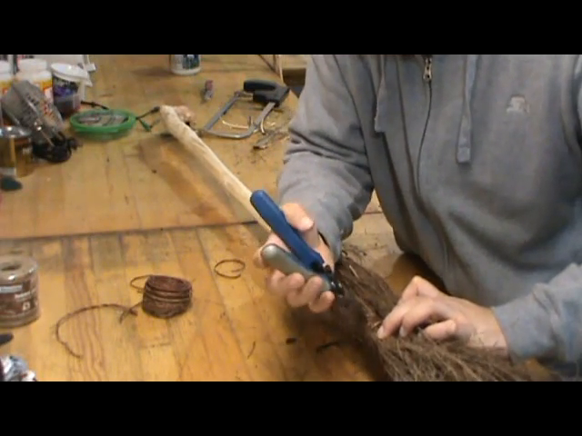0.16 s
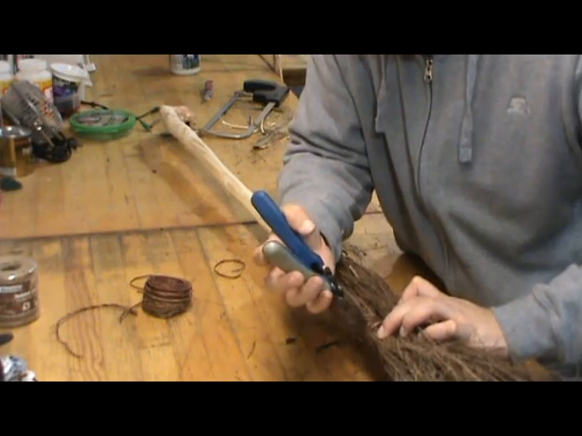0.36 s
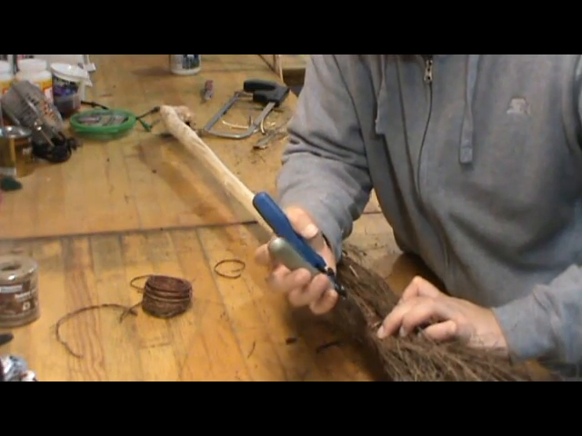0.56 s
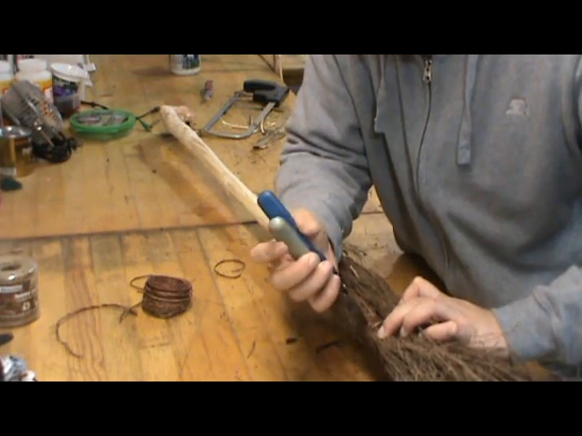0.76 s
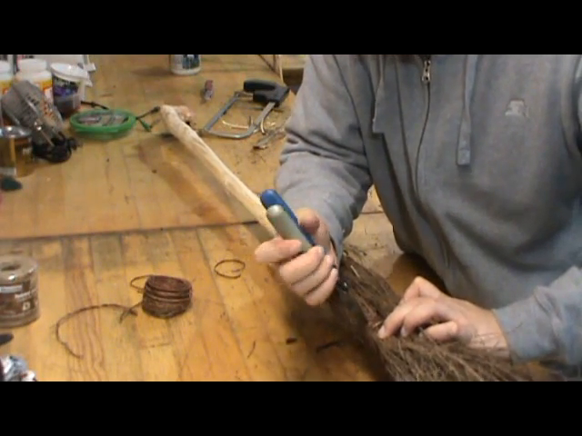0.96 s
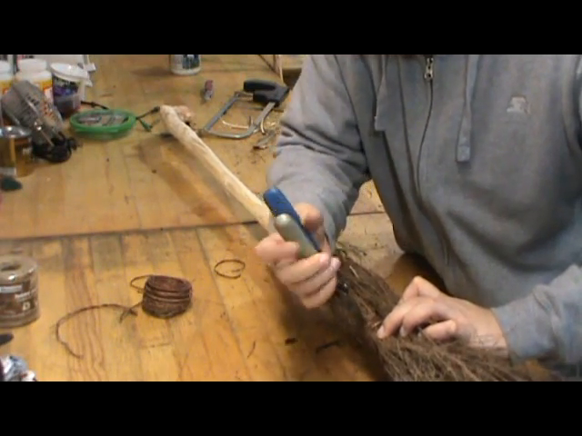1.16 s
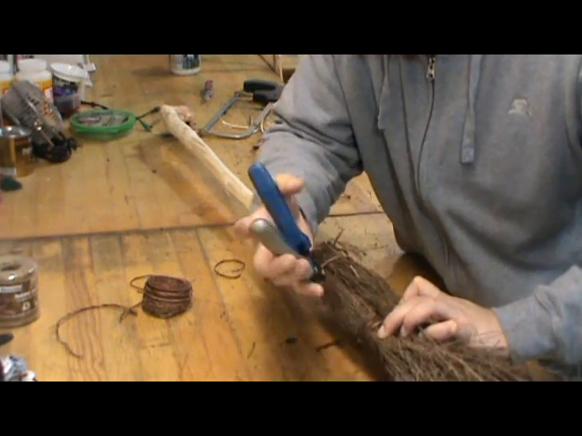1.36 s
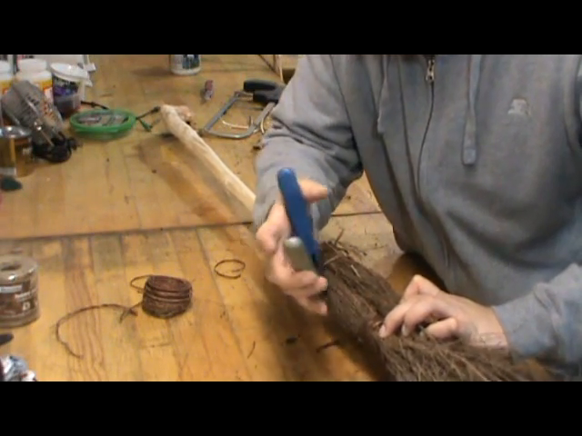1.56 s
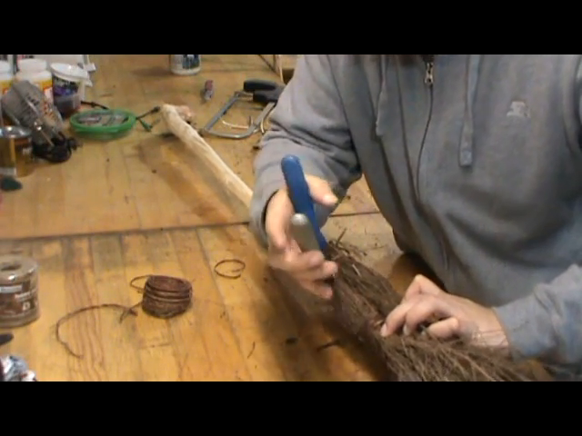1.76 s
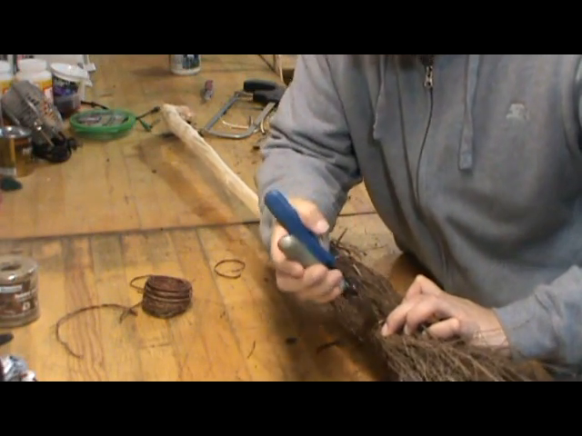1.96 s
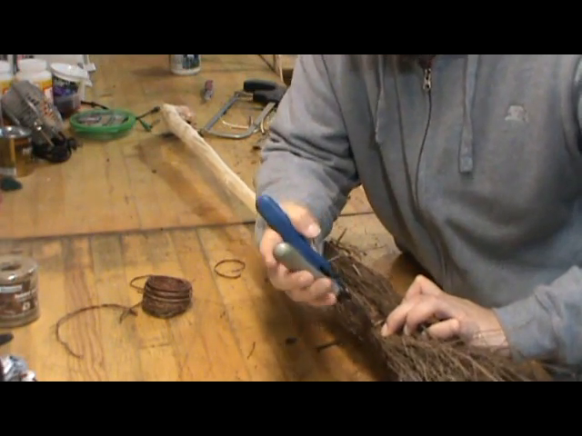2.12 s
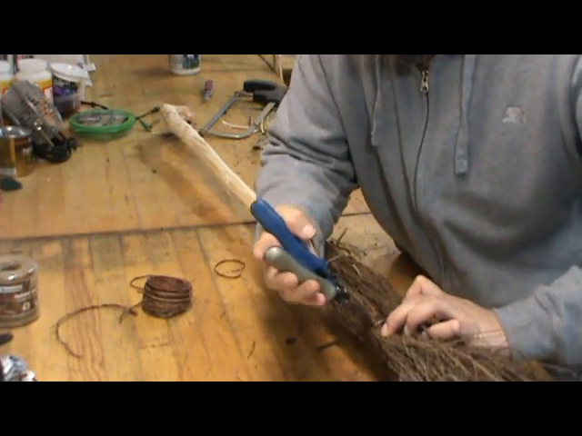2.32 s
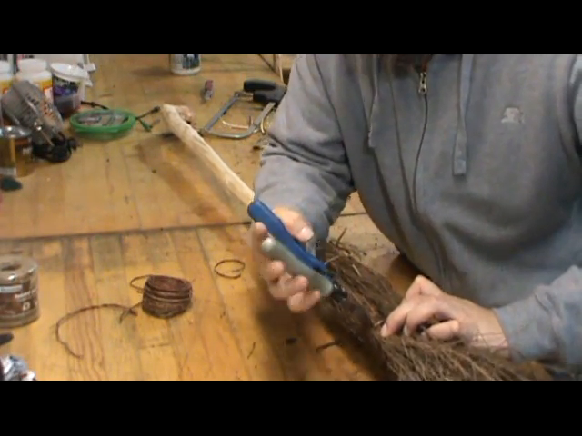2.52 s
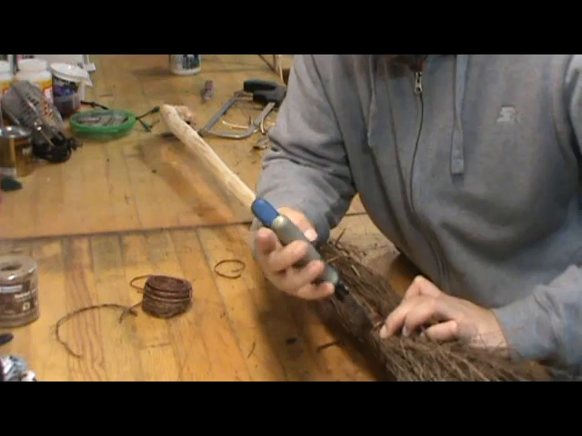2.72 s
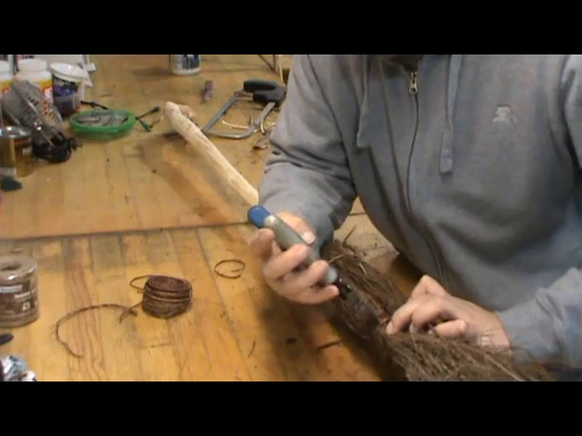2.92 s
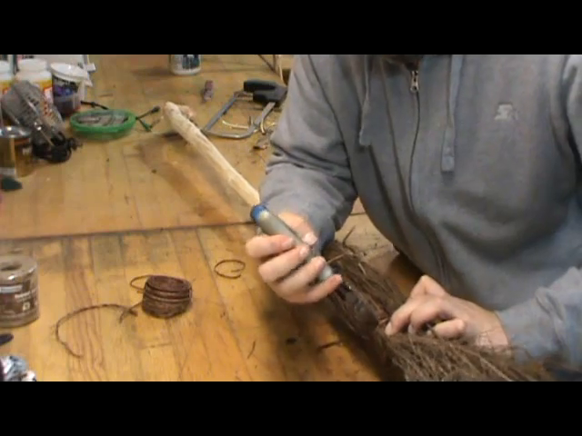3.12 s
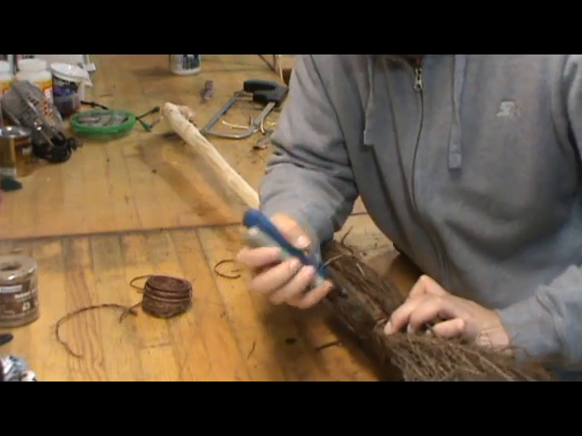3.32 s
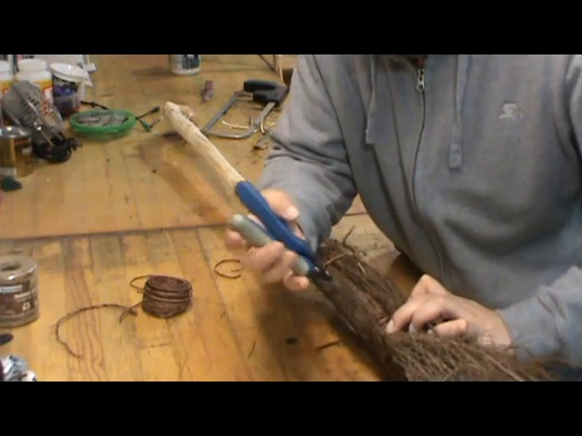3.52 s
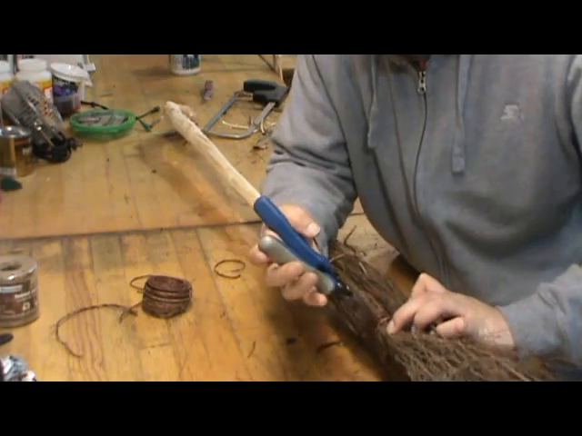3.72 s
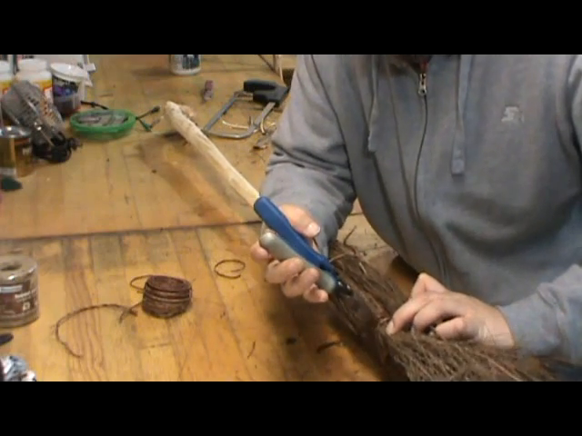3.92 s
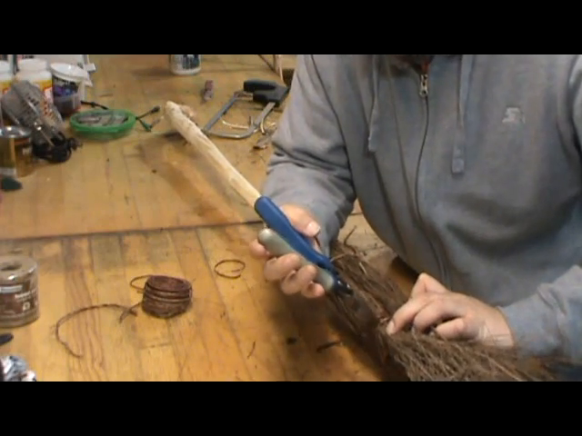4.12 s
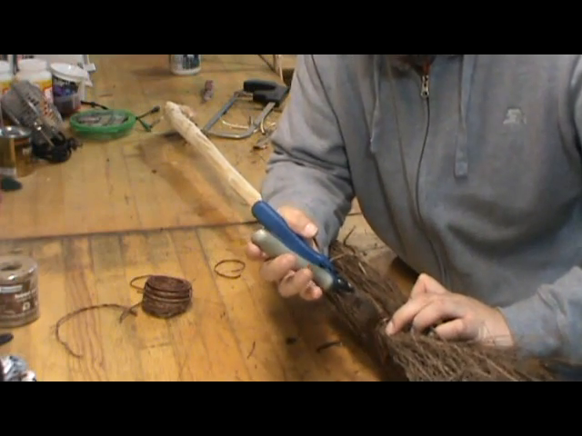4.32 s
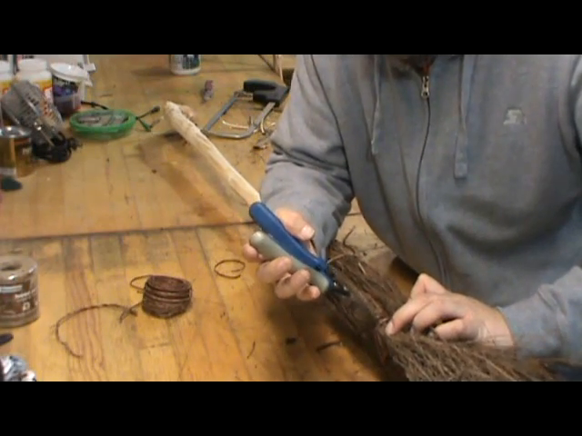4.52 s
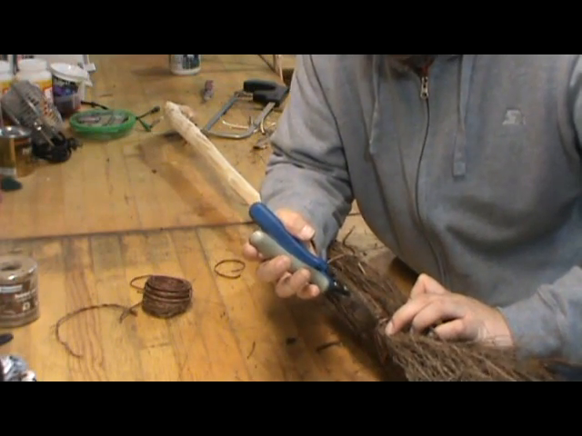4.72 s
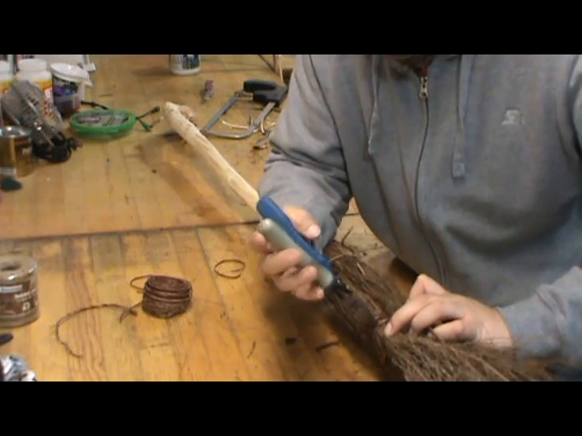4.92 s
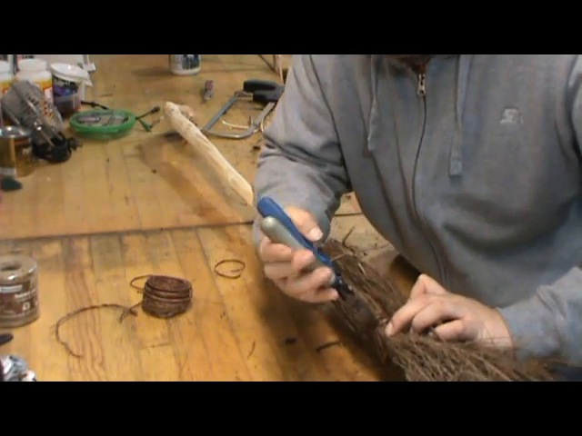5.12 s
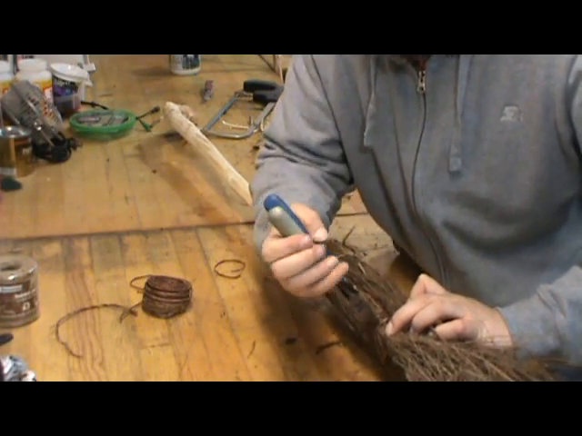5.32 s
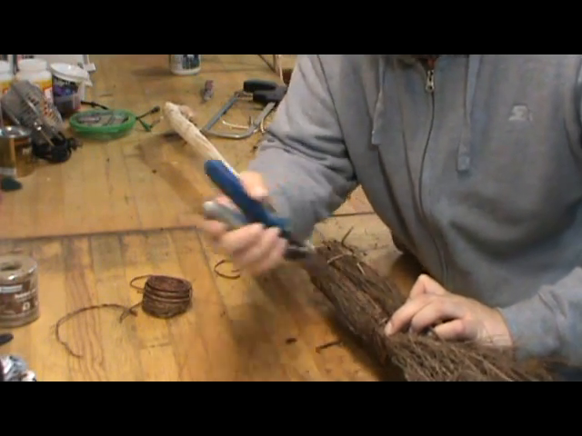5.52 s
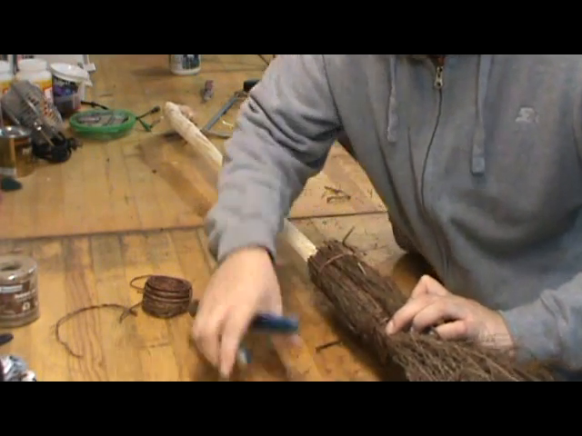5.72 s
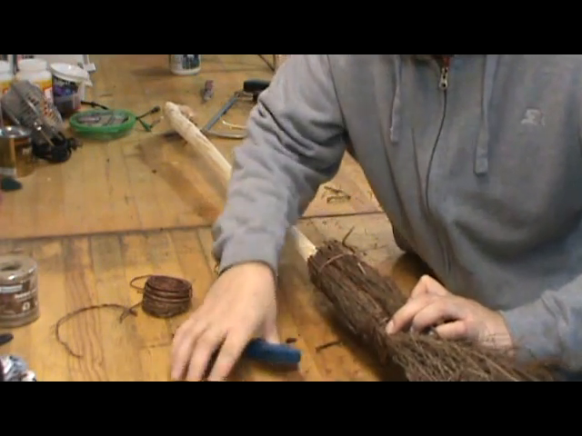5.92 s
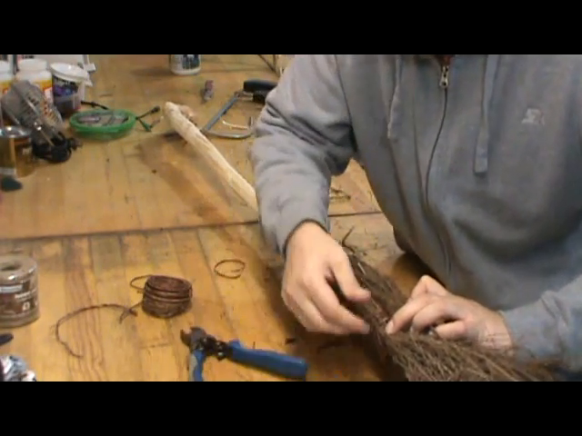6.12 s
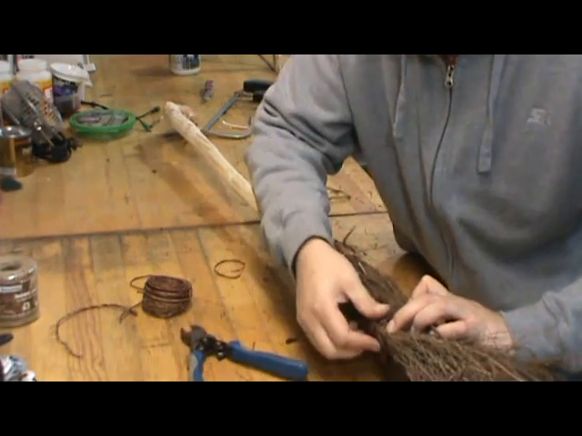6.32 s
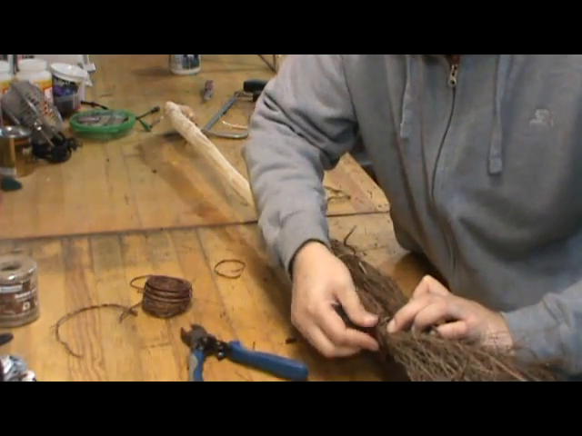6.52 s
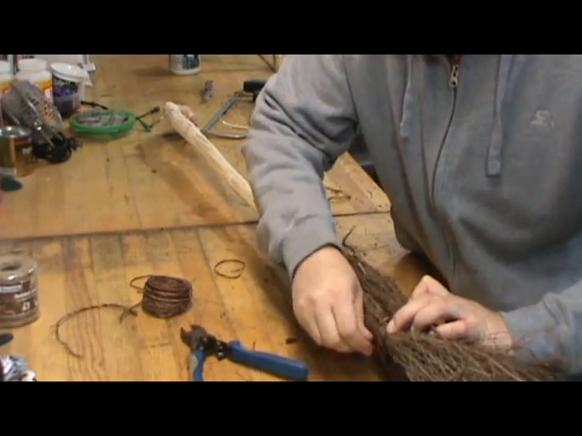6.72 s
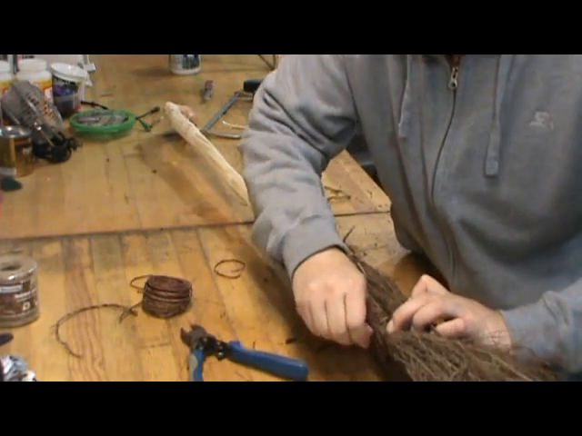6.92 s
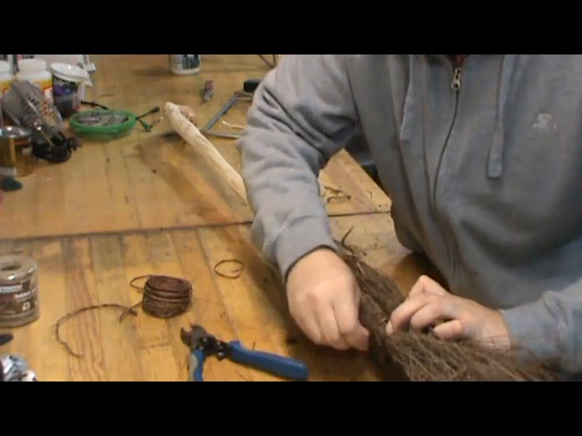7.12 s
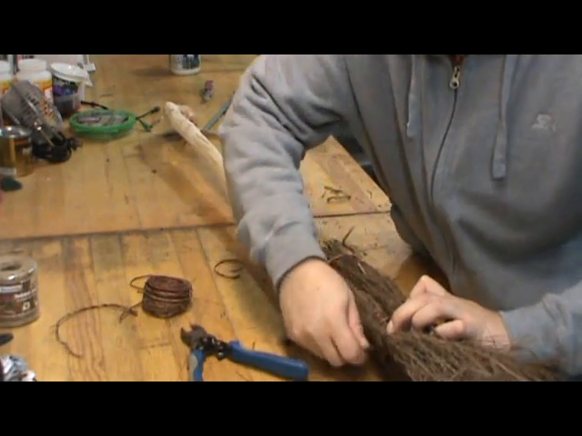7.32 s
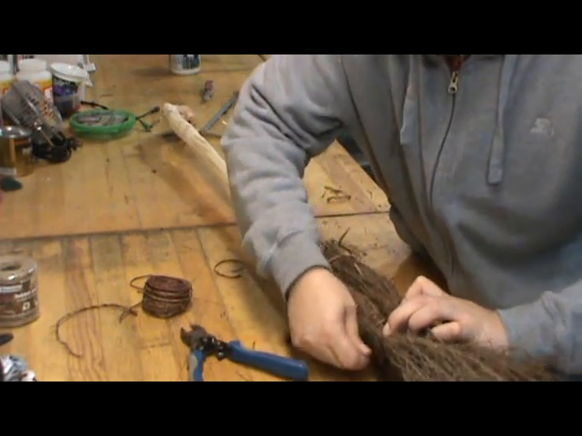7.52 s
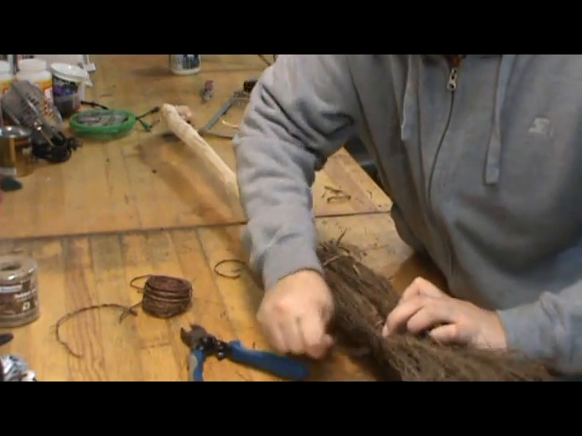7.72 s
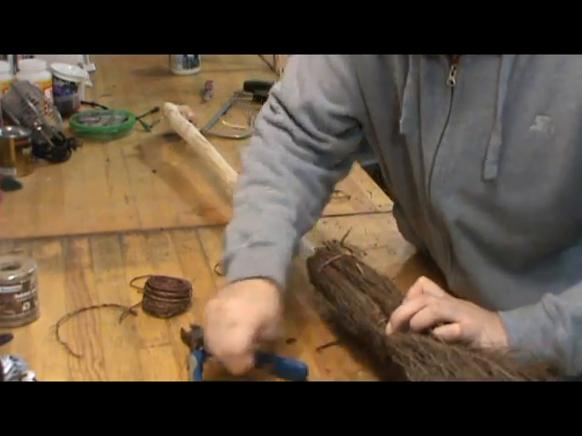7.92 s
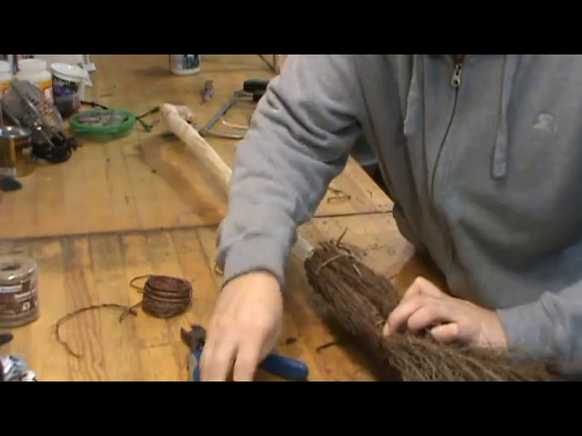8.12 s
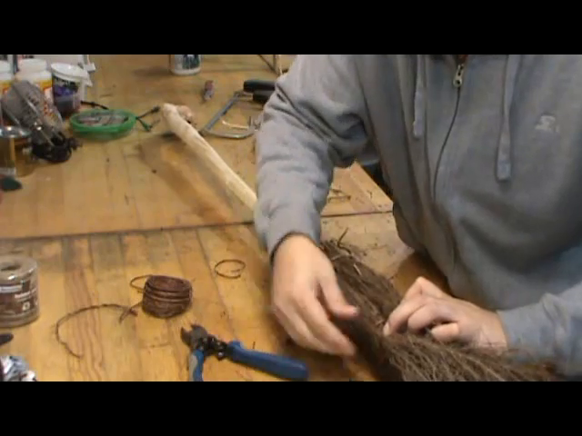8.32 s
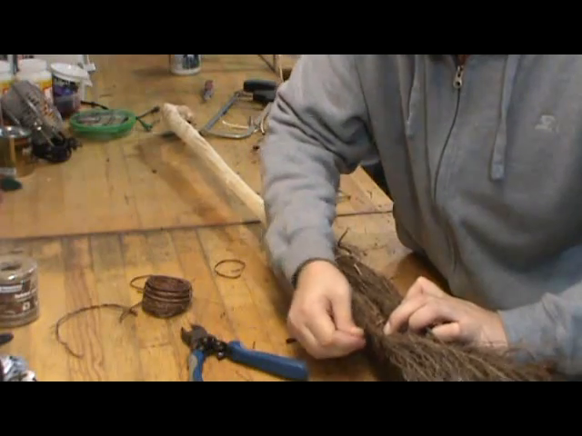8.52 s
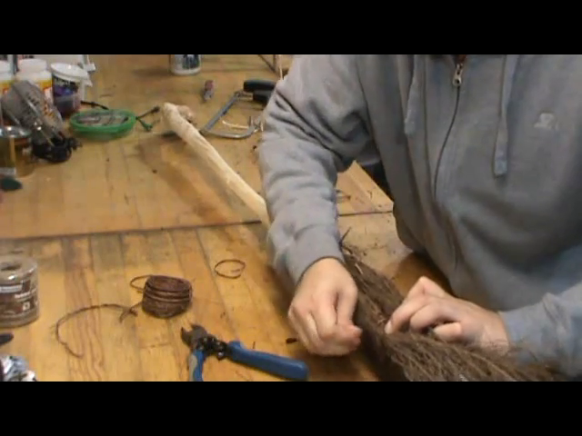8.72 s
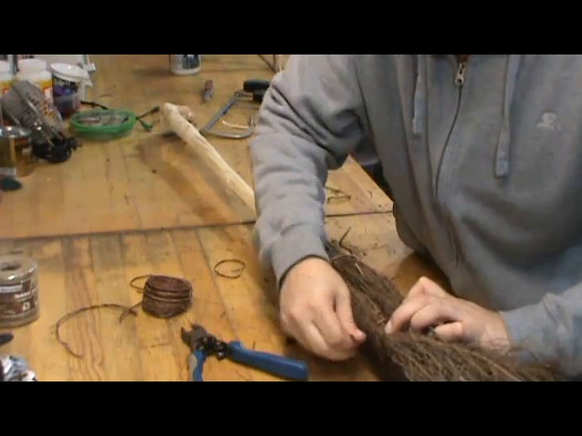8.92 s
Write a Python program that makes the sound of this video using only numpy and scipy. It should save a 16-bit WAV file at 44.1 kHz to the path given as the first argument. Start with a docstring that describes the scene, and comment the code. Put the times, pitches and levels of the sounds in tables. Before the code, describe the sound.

Wire cutters snip thin wire on dry, crackling twigs, then are dropped on a wooden workbench with a clatter.

```python
"""Wire cutters at a workbench

A small workshop, camcorder microphone a metre from a wooden bench. Cutters snap through thin wire on a
bundle of dry twigs, which crack, scrape and rustle; the bench thumps under each squeeze. The cutters
are dropped, ring the boards and rock to rest. Behind it: short echoes, mains hum, microphone hiss
and the ticking focus motor."""
import sys
import numpy as np
from scipy import signal
from scipy.fft import rfft, irfft
from scipy.io import wavfile
from scipy.ndimage import uniform_filter1d

SR = 44100
rng = np.random.default_rng(int(sys.argv[2]) if len(sys.argv) > 2 else 0)


def generate_wav(signal):
    """Clip the signal to [-1, 1] and save it as 16-bit WAV at the path in sys.argv[1]."""
    frames = np.transpose(np.atleast_2d(signal))
    scaled = np.clip(frames, -1, 1) * 32767
    pcm = np.round(scaled).astype(np.int16)
    wavfile.write(sys.argv[1], SR, pcm)


N = 399546
T = np.arange(N) / SR

# The dropped cutters tipping onto a handle. Each row: start in seconds, level in dB.
HANDLE_TIPS = [(6.392, -41.5), (6.623, -45.5), (6.82, -46), (6.993, -49), (7.112, -51.5), (8.213, -39.5)]


def undb(db):
    return 10 ** (np.asarray(db) / 20)


def level(x, rms_db):
    return x * undb(rms_db) / np.sqrt(np.mean(x ** 2))


def shape(x, curve):
    """Causal filter whose gain follows (Hz, dB) points."""
    hz, db = np.transpose(curve)
    log_gain = np.interp(np.log(np.fft.rfftfreq(8192, 1 / SR) + 1), np.log(hz), db) * np.log(10) / 20
    cepstrum = irfft(log_gain)
    cepstrum[1:4096] *= 2  # folded for minimum phase
    cepstrum[4097:] = 0
    impulse = irfft(np.exp(rfft(cepstrum)))[:4096]
    return signal.oaconvolve(x, impulse)[:len(x)]


def band(x, lo_hz, hi_hz):
    sos = signal.butter(2, [lo_hz, min(hi_hz, .45 * SR)], "bandpass", fs=SR, output="sos")
    return signal.sosfilt(sos, x)


def walk(rate_hz):
    """Random values held for 1 / rate_hz seconds and smoothed twice; spread near 1."""
    hold = int(SR / rate_hz)
    steps = np.repeat(rng.standard_normal(N // hold + 1), hold)
    return 1.3 * uniform_filter1d(uniform_filter1d(steps, hold), hold)[:N]


def add(out, start_s, sound):
    i = int(start_s * SR)
    out[..., i:i + sound.shape[-1]] += sound[..., :N - i]


def with_noise(events, samples):
    """Pairs each event with its own stretch of white noise."""
    return zip(events, rng.standard_normal((len(events), samples)))


def ring(modes, strengths):
    """Modes dying away after one blow, their T60 held within 10 to 150 ms."""
    t = T[:SR // 5]
    return sum(strength * undb(db) * np.sin(2 * np.pi * hz * t) * undb(-60 * t / np.clip(t60, .01, .15))
               for (hz, db, t60), strength in zip(modes, strengths))


def burst(noise, hz, low_db, decay_ms, spread, tick, rise_ms):
    """A break: a tick and fading splinters. Rows: direct sound, and one clean click for the walls."""
    t_ms = T[:len(noise)] * 1000
    grit = noise * np.exp(-t_ms / decay_ms) * (1 - np.exp(-t_ms / rise_ms))
    grit[0] += tick
    click = np.zeros_like(grit)
    click[int(decay_ms * SR / 2000)] = np.sqrt(np.sum(grit ** 2))  # same energy as the grit
    high = band([grit, click], hz / spread, hz * spread)
    low = band([grit, click], 450, 2770)
    return high / np.abs(high[0]).max() - undb(low_db) * low / np.abs(low[0]).max()


def hiss():
    """The microphone's steady noise, heaviest in the bass; mid and side."""
    # Noise spectra. Each row: frequency in Hz, relative density in dB.
    mid_curve = [(12, -35), (20, -5), (43, -4), (65, 2), (158, -8.5), (310, -12), (357, -15), (459, -17.5),
                 (738, -25), (1330, -32.5), (3070, -29.5), (7520, -31), (11400, -32), (12400, -31.5),
                 (16000, -33.5)]
    side_curve = [(12, -46), (20, -11), (172, -9.5), (241, -2), (293, -12), (328, 1), (357, -3.5),
                  (660, -4.5), (1260, -5), (14300, -27), (16000, -47.5)]
    mid = level(shape(rng.standard_normal(N), mid_curve), rms_db=-55)
    side = level(shape(rng.standard_normal(N), side_curve), rms_db=-58.5)
    return mid, side


def hum():
    """Mains hum and the thin whine of electronics, each tone wavering on its own."""
    # Steady tones. Each row: frequency in Hz, RMS level in dB, waver in dB.
    mains = [(58.4, -55.5, -1.5), (113.7, -65, 4), (182, -70, 3), (219, -70, 4), (303, -79.5, -3.5),
             (358.6, -63, 2), (410, -79, 4), (1297, -83, -3.5)]
    whine = [(12276, -81, 1.5), (13280, -85, 1.5)]
    return sum(2 ** .5 * undb(db + waver_db * walk(9.3)) * np.sin(2 * np.pi * (hz * T + rng.random()))
               for hz, db, waver_db in mains + whine)


def focus_motor():
    """The motor steps in short two-tone pulses that reach the microphone through the body; mid, side."""
    # Spells of focusing. Each row: start and end in seconds.
    runs = [(.55, 2.29), (2.68, 5.12), (8.1, 9.06)]
    # Motor tones. Each row: frequency in Hz, level in dB, share sent to the side channel.
    partials = [(1213, -67, .6), (2412, -64.5, -.3)]
    step_hz, first_step_s = 29.97, .0135
    phase = ((T - first_step_s) * step_hz + .5) % 1 - .5
    running = sum((T > start) & (T < end) for start, end in runs)
    pulses = running * np.exp(-(phase / .18) ** 2) * undb(2 * walk(15))
    tones = [pulses * undb(db) * np.sin(2 * np.pi * hz * T) for hz, db, _ in partials]
    return sum(tones), sum(tone * share for tone, (_, _, share) in zip(tones, partials))


def workshop(direct, to_walls):
    """Direct sound, close echoes off bench and body, and a tail whose treble dies first; mid and side."""
    # Room decay. Each row: frequency in Hz, T60 in seconds.
    decay = [(150, 0.44), (500, 0.32), (1300, 0.37), (3500, 0.3), (6000, 0.23), (9000, 0.21), (15000, 0.18)]
    # Stereo width. Each row: frequency in Hz, side gain in dB.
    width = [(60, -3), (200, -5), (700, -2.5), (1300, -8.5), (2400, -8), (4400, -14.5), (8000, -13),
             (15000, 11)]
    early_db, early_decay_ms, tail_db = -7.5, 5.9, -31.5
    t = T[:SR // 2]
    hz, t60 = np.transpose(decay)
    octaves_hz = 180 * 2. ** np.arange(7)
    octave_t60 = np.interp(np.log(octaves_hz), np.log(hz), t60)
    echoes = []
    for _ in range(2):
        reflections = rng.standard_normal(len(t)) * (rng.random(len(t)) < .2) * (t > .002)
        early = band(reflections * np.exp(-t * 1000 / early_decay_ms), 350, 19000)
        early = undb(early_db) * early / np.sqrt(np.sum(early ** 2))
        tail = sum(band(rng.standard_normal(len(t)), f / 2 ** .5, f * 2 ** .5) * undb(-60 * t / fade_s)
                   for f, fade_s in zip(octaves_hz, octave_t60))
        tail *= undb(tail_db) * (1 - np.exp(-t / .0015))
        echoes.append(signal.fftconvolve(to_walls, early + tail)[:N])
    return direct + echoes[0], shape(echoes[1] - .19 * direct, width)


def boards(noise, contact_ms):
    """A brief push rings the bench boards, each mode up or down by where it lands; peak 1."""
    # Modes of the wood. Each row: frequency in Hz, relative level in dB, nominal T60 in seconds.
    modes = [(114.6, -9, 0.21), (200, -5.5, 0.12), (284, -1.5, 0.045), (383.5, -4, 0.058),
             (517, -9.5, 0.081), (626, 1.5, 0.014), (766, -5.5, 0.058), (856, 1.5, 0.014), (1070, 2, 0.017),
             (1166, -6, 0.04), (1383, -4.5, 0.022), (1630, -8.5, 0.021), (1840, -10, 0.0091),
             (2035, -13, .025), (2580, -18, 0.016)]
    u = T[:1024] * 5000 / contact_ms
    push = u * np.exp(-u)  # peaks a fifth of the way through the contact
    wood = signal.fftconvolve(push, ring(modes, np.sign(noise) + .06 * noise))
    return wood / np.abs(wood).max()


def bench_thumps():
    """Each press bows the bench top: low cycles that sag in pitch, and a soft knock in the boards."""
    # Weight on the bench. Each row: start in seconds, peak in dB, knock relative to that in dB.
    presses = [(.249, -39.5, -22), (.655, -42, -19), (.951, -43, -19.5), (1.119, -32, -5.5),
               (2.098, -27, -9), (2.304, -41, -17.5), (2.876, -41, -20), (2.993, -41, -12.5),
               (3.246, -26.5, 0), (4.424, -35, -8), (4.5, -42, -18.5), (5.152, -45, -28),
               (5.328, -36.5, -26), (5.415, -26.5, -7), (5.995, -32, -40), (6.697, -46, -22.5),
               (7.798, -38.5, -9), (8.211, -45, -1)]
    rest_hz, overshoot, sag_s = 69.5, .36, .014
    rise_s, t60_s = .0033, .23
    bow, knock, t = np.zeros(N), np.zeros(N), T[:SR // 3]
    swell = (1 - np.exp(-t / rise_s)) * undb(-60 * t / t60_s)
    pitch_hz = rest_hz * (1 + overshoot * np.exp(-t / sag_s))
    cycles = swell * np.sin(2 * np.pi * np.cumsum(pitch_hz) / SR)
    for (start, db, knock_db), noise in with_noise(presses, 32):
        add(bow, start, undb(db) * cycles / np.abs(cycles).max())
        add(knock, start, undb(db + knock_db) * boards(noise, contact_ms=6.4))
    return bow, knock


def rocking():
    """A handle leans on the boards for a moment and drives a short, dull drone."""
    drone_hz, length_s = 195.7, .036
    out, t = np.zeros(N), T[:int(length_s * SR)]
    drone = signal.windows.tukey(len(t), .5) * np.sin(2 * np.pi * drone_hz * t)
    for start, db in HANDLE_TIPS:
        add(out, start, undb(db) * drone)
    return out


def knocks():
    """The cutters land, bounce with ever less steel clatter and tip over; later a hand bumps the wood."""
    # Blows on the boards. Each row: start in seconds, level in dB, contact time in ms.
    blows = [(5.9874, -7.5, 1), (6.005, -14.5, 1.1), (6.0191, -6.5, 0.41), (6.043, -36, .6),
             (6.086, -17.5, 0.17), (6.093, -24, 0.39), (6.11, -25, 1.3), (6.148, -24, 2.2),
             (6.153, -12, 0.66), (6.188, -31.5, 0.55), (7.749, -46, 1.7), (7.847, -34.5, 4.8),
             (8.198, -36, .9)]
    landing_s, settle_db_per_s = blows[0][0], 74
    out = np.zeros((2, N))
    for (start, db, contact_ms), noise in with_noise(blows, 2048):
        add(out, start, undb(db) * boards(noise, contact_ms))
        clatter = burst(noise, hz=5960, low_db=9.1, decay_ms=7, spread=1.9, tick=.47, rise_ms=.73)
        clatter_db = db - 22 - settle_db_per_s * (start - landing_s)
        add(out, start, undb(clatter_db) * clatter)
    for (start, db), noise in with_noise(HANDLE_TIPS, 32):
        add(out, start, undb(db + 6.5) * boards(noise, contact_ms=3.4))
    return out


def twig_rustle():
    """Twigs rub in a dense scatter of tiny cracks, brighter as it gets louder."""
    # Movement of the bundle. Each row: time in seconds, level of the high band in dB.
    movement = [(0, -76), (.43, -84), (1, -67), (1.3, -67.5), (1.5, -75), (1.92, -74.5), (2.67, -75.5),
                (3.22, -63.5), (3.4, -61.5), (3.53, -71), (3.92, -72), (4.06, -78), (5, -73.5), (5.4, -65),
                (5.6, -61), (5.77, -78), (5.98, -68), (6.3, -70.5), (7.02, -72), (7.53, -66), (7.74, -58),
                (7.87, -63), (7.98, -78), (8.27, -71), (8.68, -63.5), (9.06, -71.5)]
    grains_per_s, bands_equal_db, brightening = 1200, -75, .81
    rub_db = np.interp(T, *np.transpose(movement))
    grains = (rng.random(N) < grains_per_s / SR) * rng.standard_normal(N) * undb(3 * walk(45))
    high = level(band(grains, 1900, 11000), 0)
    low = level(band(grains, 845, 2650), brightening * (bands_equal_db - rub_db))
    return (high + low) * undb(rub_db)


def twig_scrapes():
    """Twigs and wire drag past each other in short, gritty swells."""
    # Drags. Each row: start in seconds, level in dB, centre in Hz, relative low band in dB,
    # decay in ms, band spread as a ratio.
    drags = [(0.599, -44.5, 7000, -11, 4.9, 2), (.89, -51.5, 6400, -25, 20, 1.2),
             (1.2992, -44, 6640, -18, 38, 2), (2.9136, -42.5, 6550, -9, 6.3, 1.5),
             (3.458, -31.5, 7320, -17, 18, 2), (3.468, -36.5, 5170, -34, 6.6, 1.07),
             (3.7186, -46.5, 6050, -16, 37, 1.9), (3.7982, -47, 6500, -16, 33, 2.1),
             (5.72, -52, 4940, -26, 16, 1.5), (6.574, -42.5, 4730, -7.5, 14, 2),
             (6.7099, -40, 5670, -39, 17, 1.94), (6.9898, -44, 7680, -16, 72, 1.7),
             (7.0284, -44, 3430, -21, 33, 2.1), (7.273, -41, 6500, -31, 12, 2),
             (7.47, -47, 5500, -18, 23, 1.9), (7.7034, -45, 6100, 0, 36, 2.1),
             (7.72, -52, 1870, -20, 25, 1.05), (7.744, -34.5, 7030, -15, 65, 1.9),
             (7.7859, -31, 3800, -8, 30, 2.15), (7.8257, -26.5, 7360, -10.5, 11, 1.9),
             (7.9392, -21.5, 7080, -16, 7.9, 1.7), (7.94, -39, 1900, -43, 5.3, 1),
             (7.95, -38, 6360, -30, 3.6, 1.7), (8.099, -39, 7060, -29, 12, 1.5),
             (8.118, -39, 5950, -40, 4.2, 1.11), (8.1394, -41, 6240, -34, 10, 1.6),
             (8.196, -30.5, 5030, -12.5, 3.2, 2.3), (8.597, -37, 9700, -18, 17, 2.15),
             (8.6976, -41, 4550, -18, 3.1, 2.1)]
    out = np.zeros(N)
    for (start, db, hz, low_db, decay_ms, spread), noise in with_noise(drags, 4096):
        scrape, _ = burst(noise ** 3, hz, low_db, decay_ms, max(spread, 1.03), tick=0, rise_ms=5.9)
        add(out, start, undb(db) * scrape)
    return out


def twig_cracks():
    """Dry twigs break one at a time, each a splintering burst with a thin bright edge."""
    # Breaks. Each row: start in seconds, level in dB, centre in Hz, relative low band in dB.
    breaks = [(0.28, -52, 5000, -26), (0.518, -51, 6090, -8), (0.64, -41.5, 6060, -11),
              (0.7714, -46, 6700, -16), (1.2358, -37, 8800, -18), (1.3348, -45, 3600, -19),
              (1.497, -48.5, 4670, -9), (2.0934, -40, 4660, -13), (2.2945, -39, 7080, -16),
              (2.66, -53.5, 3200, -4), (2.804, -43, 6590, -10), (2.8568, -43, 6200, -21),
              (2.8747, -43, 9030, -11), (2.9871, -44.5, 6510, -17), (3.1263, -45, 9300, -15),
              (3.216, -44, 7500, -28), (3.4166, -44.5, 6460, -9), (3.49, -28.5, 7200, -14),
              (3.944, -46.5, 3950, -22), (4.0143, -50.5, 8610, -3), (4.2909, -43, 5800, -8.5),
              (4.425, -52, 6000, -17), (4.4994, -44.5, 6740, -15), (4.6173, -46.5, 5760, -5.5),
              (4.9377, -52, 5000, -20), (4.9889, -50.5, 4500, -6), (5.096, -55.5, 4000, 2),
              (5.1253, -46.5, 6100, -20), (5.2699, -49.5, 9240, -33), (5.3141, -31.5, 6470, -25),
              (5.7855, -50.5, 6030, -20), (6.257, -48.5, 5600, -18), (6.5034, -45.5, 9500, -15),
              (6.6232, -46, 6710, -14), (6.9762, -37.5, 6960, -26), (7.069, -37.5, 3900, -13),
              (7.31, -40.5, 3640, -34), (7.502, -46.5, 6100, -12), (7.635, -45, 5730, -29),
              (7.8084, -28.5, 6800, -16), (7.8456, -18, 7000, -11.5), (7.9502, -13.5, 7740, -17),
              (8.123, -35, 8000, -37), (8.194, -32.5, 5400, -15), (8.4447, -47.5, 3500, -4.5),
              (8.714, -36, 5140, -3.5), (8.97, -45.5, 4300, -7)]
    out = np.zeros((2, N))
    for (start, db, hz, low_db), noise in with_noise(breaks, 2048):
        crack = burst(noise, hz, low_db, decay_ms=3.8, spread=1.89, tick=.95, rise_ms=.99)
        edge = burst(noise[::-1], hz=15200, low_db=-70, decay_ms=3.8, spread=1.08, tick=.94, rise_ms=.5)
        add(out, start, undb(db) * crack + undb(db - 2) * edge)
    return out


def snips():
    """The jaws clap shut through wire: a rattle, a bright edge and the damped ring of hand-held steel."""
    # Cuts. Each row: start in seconds, level in dB, centre in Hz, relative low band in dB,
    # relative edge in dB, rattle decay in ms.
    cuts = [(1.1088, -10, 4680, -26, -11, 4.33), (3.2269, -24, 5360, -17, -5, 1.7),
            (3.2454, -12.5, 5100, -19, -5, 4), (5.4057, -7, 5000, -28, -6, 5.7)]
    # Modes of the jaws. Each row: frequency in Hz, relative level in dB, T60 in seconds.
    jaw_modes = [(2450, -7, .025), (3550, -3, .03), (4200, -1, .025), (4640, 0, .035), (5100, -4, .03),
                 (5650, -3, .04), (6205, -4, .035), (7300, -7, .03), (8450, -12, .03)]
    steel_db = np.array([[-8], [-7]])  # direct, to the walls
    out = np.zeros((2, N))
    for (start, db, hz, low_db, edge_db, decay_ms), noise in with_noise(cuts, 2048):
        clap = burst(noise, hz, low_db, decay_ms, spread=1.58, tick=.47, rise_ms=.41)
        edge = burst(noise[::-1], 14370, -67, decay_ms, spread=1.08, tick=1.6, rise_ms=.072)
        mode_strengths = undb(2 * noise[99:])
        steel = signal.fftconvolve(clap[0, :160], ring(jaw_modes, mode_strengths))
        add(out, start, undb(db) * clap + undb(db + edge_db) * edge)
        add(out, start, undb(db + steel_db) * steel / np.abs(steel).max())
    return out


def scene():
    """The bench from a metre away, mixed as mid and side and returned as left and right."""
    # Microphone colour. Each row: frequency in Hz, gain in dB.
    microphone = [(100, -2.5), (1200, 2), (2450, 3.5), (2900, -2.5), (3450, 2), (4500, 2), (6000, 4),
                  (9500, 2.5), (11000, -3.5), (13200, -15.5), (15300, -16), (16000, -23.5)]
    bow, press_knocks = bench_thumps()
    work = snips() + twig_cracks() + twig_scrapes() + twig_rustle() + knocks() + press_knocks
    direct, to_walls = (shape(row, microphone) for row in work)
    mid, side = workshop(direct, to_walls)
    motor_mid, motor_side = focus_motor()
    mid = mid + bow + rocking() + hum() + motor_mid
    side = side + undb(-26) * bow + motor_side
    hiss_mid, hiss_side = hiss()
    mid, side = mid + hiss_mid, side + hiss_side
    return np.array([mid + side, mid - side])


def record(dry):
    """The camcorder cuts the top treble steeply."""
    cutoff_hz = 15850
    return signal.sosfilt(signal.ellip(10, .2, 80, cutoff_hz, fs=SR, output="sos"), dry)


dry = scene()
out = record(dry)
generate_wav(out)
```